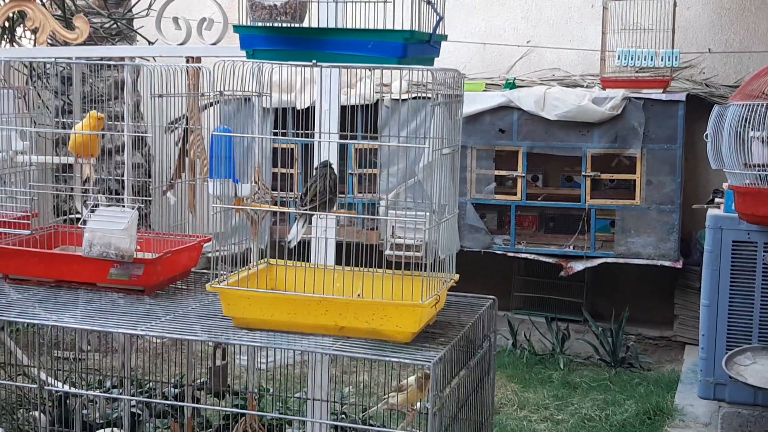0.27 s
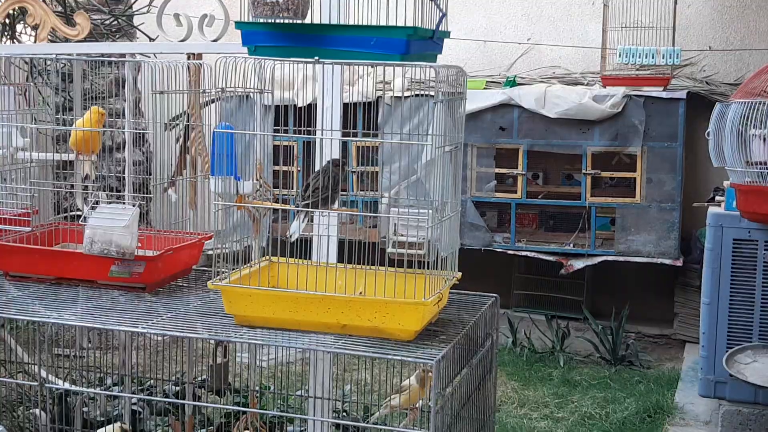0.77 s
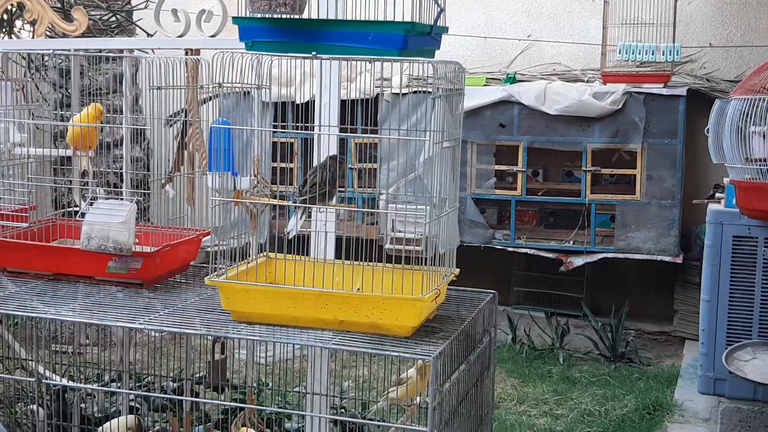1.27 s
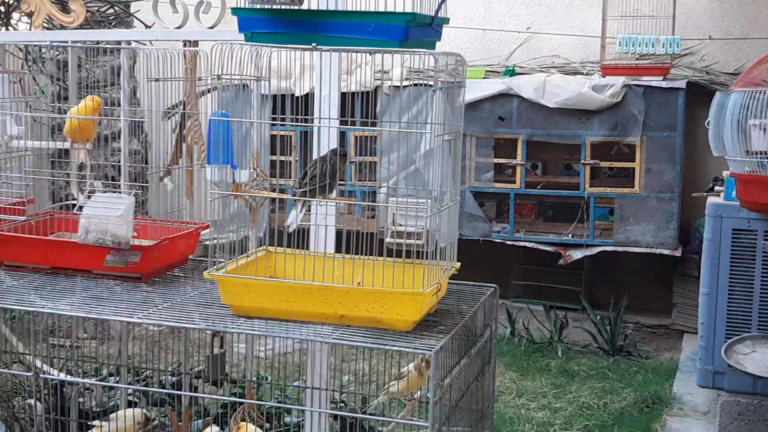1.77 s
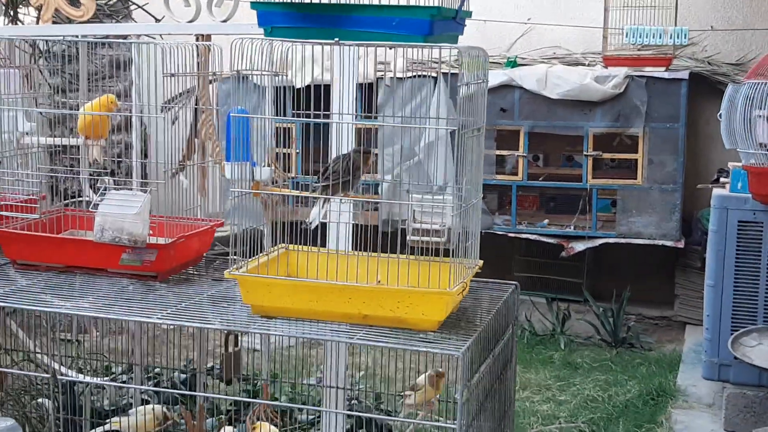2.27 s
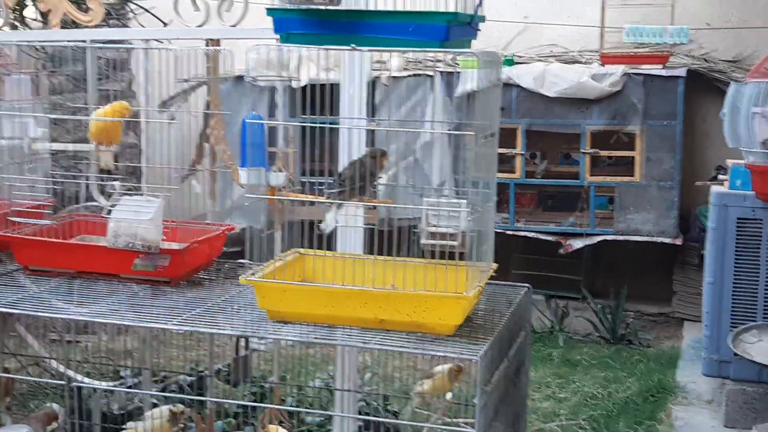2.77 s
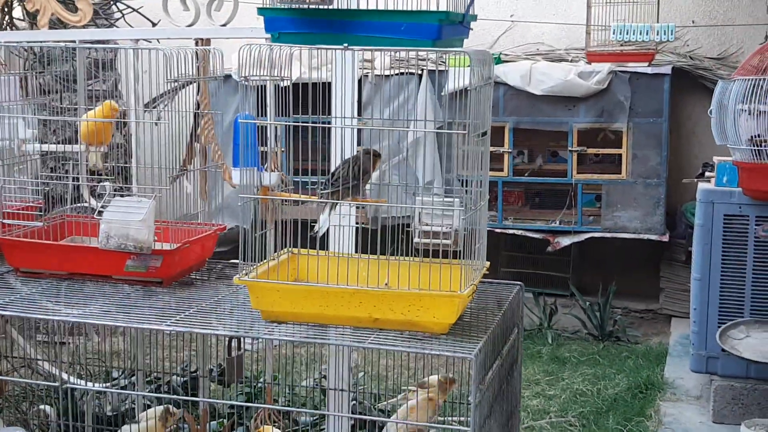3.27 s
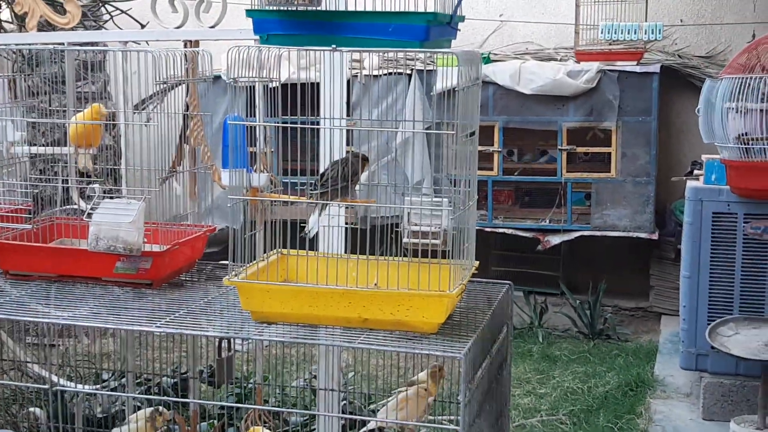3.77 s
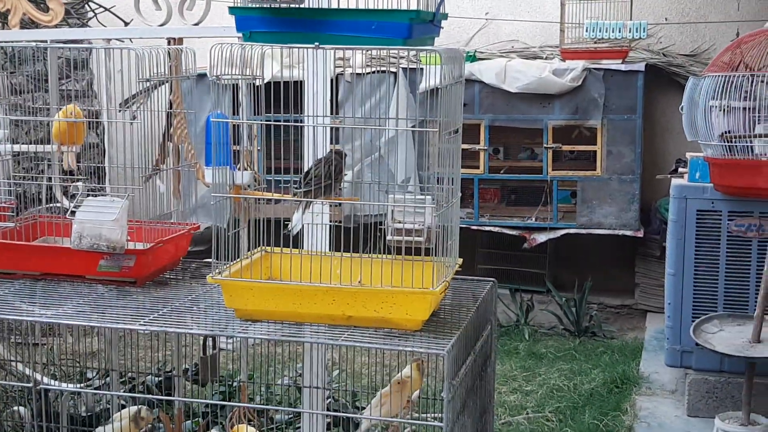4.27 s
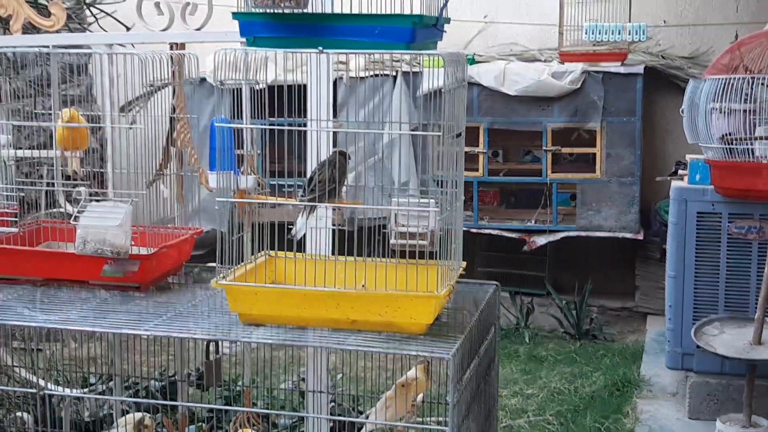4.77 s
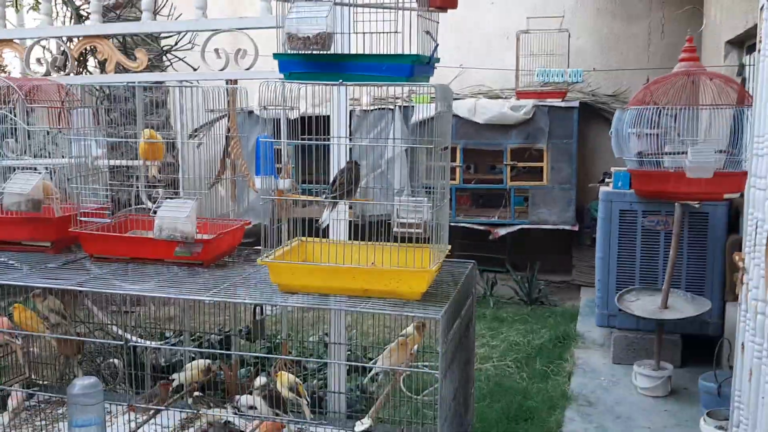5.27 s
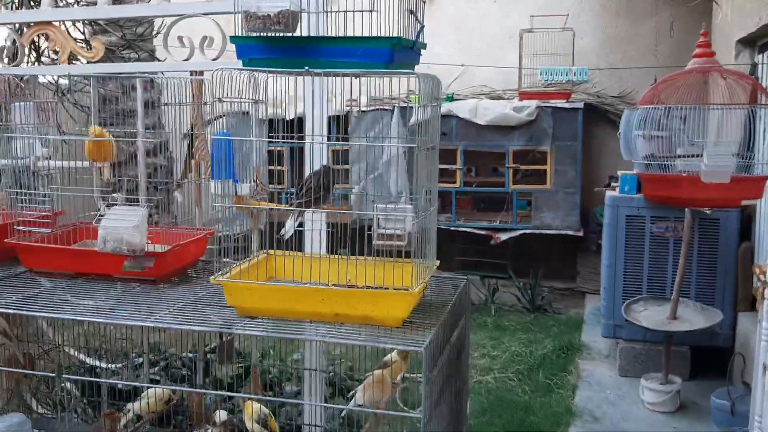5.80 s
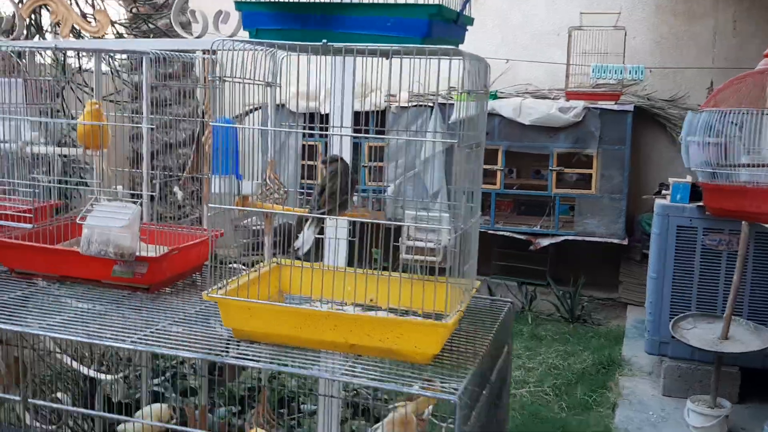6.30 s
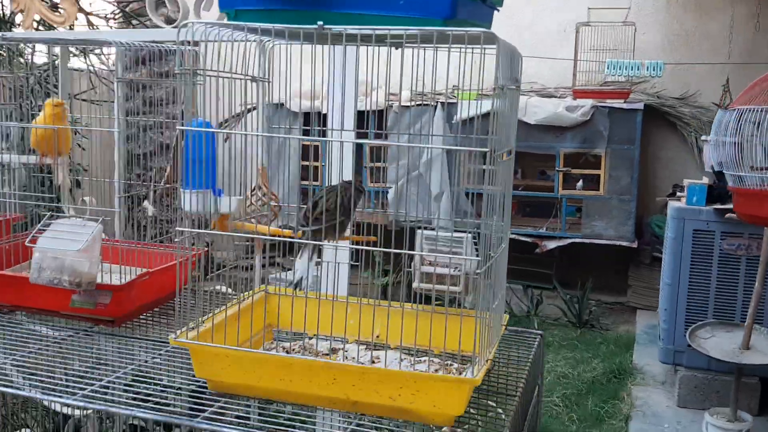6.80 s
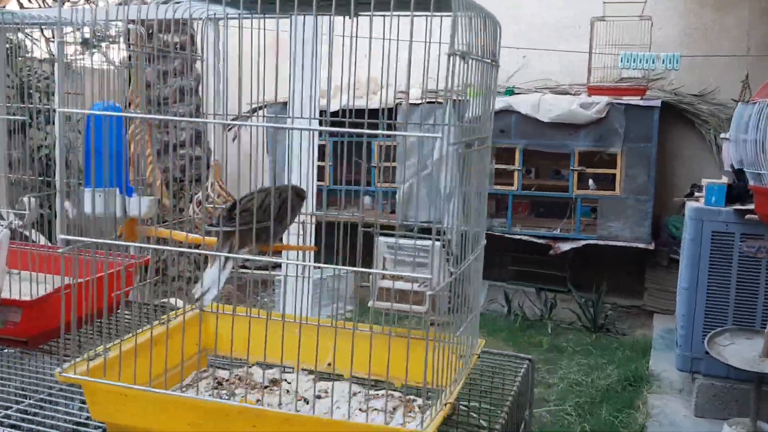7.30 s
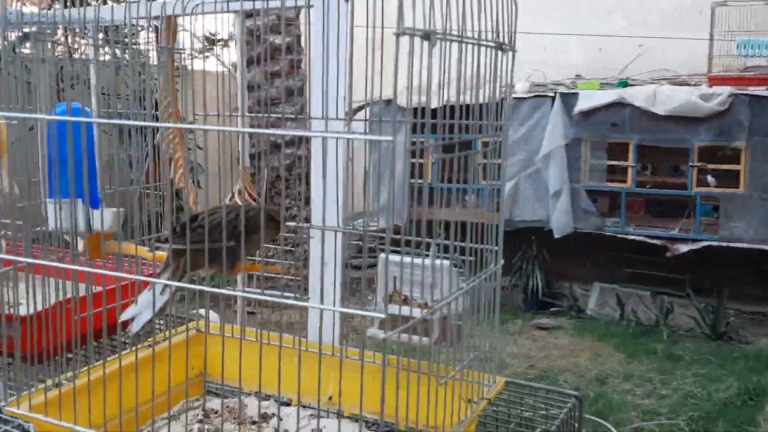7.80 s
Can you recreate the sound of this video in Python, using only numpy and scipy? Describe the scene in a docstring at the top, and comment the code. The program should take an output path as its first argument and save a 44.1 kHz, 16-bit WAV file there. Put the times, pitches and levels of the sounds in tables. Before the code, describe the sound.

Bright canary song with rising slurs, falling sweeps and fast trills fills an echoing yard, ending in loud sweet calls and handling rustle.

```python
"""Caged canaries in a courtyard

Canaries sing over one another: gliding sine whistles, arched chips, held notes and fast rolls of falling pips.
Random small slurs make the far birds; short noise bursts tick on the cages and shaped noise flutters and rustles.
Decaying noise echoes the walls; coloured noise and sines make the town rumble, low rush, hiss and hum.
The hand-held camera is carried closer with a rustle and a step, and the song's reflections weaken."""
import sys
import numpy as np
from scipy import signal
from scipy.fft import rfft, irfft, next_fast_len
from scipy.io import wavfile
from scipy.ndimage import uniform_filter1d, map_coordinates

SR = 44100
rng = np.random.default_rng(int(sys.argv[2]) if len(sys.argv) > 2 else 0)


def log_audio(samples):
    """Write samples as a 16-bit WAV file to the path given in sys.argv[1]."""
    # one column per channel
    frames = np.atleast_2d(samples).T
    # limit to full scale, then quantise
    limited = np.clip(frames, -1, 1)
    pcm = np.round(limited * 32767).astype(np.int16)
    wavfile.write(sys.argv[1], SR, pcm)


N = 355005

# Levels in the tables are relative: layer trims and the microphone's response follow.
# Pan is left against right in dB, positive to the left.
# A note's shape gives its offsets early, midway and late.

# Loudness shape of a steep pip or flick: [level/dB]
PIP_SHAPE = [-0.5, -1, -2.5]


def amp(db):
    """Decibels to gain."""
    return 10 ** (np.asarray(db) / 20)


def unit(x):
    """Scale to rms 1."""
    return x / np.sqrt(np.mean(x ** 2) + 1e-20)


def along(points, hz):
    """Read (f/Hz, value) points on a log frequency axis."""
    f, v = np.transpose(points)
    return np.interp(np.log(hz + 1), np.log(f + 1), v)


def curve(rows):
    """Turn (t/s, value) rows into one value per sample."""
    return np.interp(np.arange(N) / SR, *np.transpose(rows))


def wobble(rate, n):
    """A smooth random curve of n samples, with rate knots a second."""
    return map_coordinates(rng.standard_normal(int(n * rate / SR) + 4), [np.arange(n) * rate / SR])


def filtered(x, response):
    """Multiply the spectrum of x by a response of frequency."""
    n = x.shape[-1]
    m = next_fast_len(n + 8192)
    spectrum = rfft(x, m) * response(np.fft.rfftfreq(m, 1 / SR))
    return irfft(spectrum, m)[..., :n]


def noise(spectrum, n):
    """Coloured stereo noise of rms 1: left and right agree in the bass and part company towards the treble."""
    # Stereo likeness of diffuse sound: [f/Hz, left-right correlation]
    likeness = [(100, .985), (250, .88), (500, .6), (1000, .05), (3000, 0)]

    def colour(hz):
        turn = np.arccos(np.clip(along(likeness, hz), -1, 1)) / 2
        return amp(along(spectrum, hz)) * [np.cos(turn), np.sin(turn)]
    mid, side = filtered(rng.standard_normal((2, n)), colour)
    return unit(np.array([mid + side, mid - side]))


def panned(pan_db):
    """Left and right gains of mean power 1."""
    return unit(amp([[pan_db / 2], [-pan_db / 2]]))


def add(track, s, sound):
    """Mix a sound into the track at time s."""
    start = max(round(s * SR), 0)
    part = sound[..., :max(N - start, 0)]
    track[..., start:start + part.shape[-1]] += part


def whistle(length, pitch_hz, level_db):
    """One note of the syrinx: a nearly pure tone gliding through three pitches and three levels."""
    waver, flutter_db = 0.009, 3.5  # random pitch (share) and level on a full glide
    edge = 0.0045 + 0.073 * length  # fade in s: long notes swell and fade more gently
    t = np.arange(int((length + edge) * SR)) / SR
    u = (t - .002) / length
    hz = np.polyval(np.polyfit([0, .5, 1], pitch_hz, 2), np.clip(u, -.1, 1.1))
    # fast glides are less steady than held notes
    glide = min(1, abs(np.log2(pitch_hz[2] / pitch_hz[0])) * 3 + 0.41)
    hz = hz * (1 + waver * glide * wobble(199.5, len(t)))
    phase = 2 * np.pi * np.cumsum(hz) / SR
    gate = np.sin(np.pi / 2 * np.clip(np.minimum(t, t[-1] - t) / edge, 0, 1)) ** 2
    db = np.interp(u, [1 / 6, 1 / 2, 5 / 6], level_db)
    db = db + flutter_db * glide * wobble(118.0, len(t))
    tone = np.sin(phase) + amp(-42) * np.sin(2 * phase)
    tone += amp(-46) * np.sin(3 * phase) * (hz < SR / 6)  # keep the third harmonic below Nyquist
    return np.sqrt(2) * amp(db) * gate * tone


def near_paths(sound, pan_db, bounce_db):
    """Direct sound plus bounces off trays, table and ground; against a glide the late copies beat."""
    count, reach = 4, .016  # number of bounces, and the range of their delays in s
    lead, spread = .00006, .00004  # mean and scatter of the lag between microphone ports in s
    delays = np.r_[0, .0015 + reach * rng.random(count)]
    gains = np.r_[1, amp(bounce_db) * np.ones(count)]
    # every path reaches the two ports at slightly different times, bounces most of all
    lags = lead + spread * rng.standard_normal(count + 1) * np.r_[1, 3 * np.ones(count)]

    def paths(hz):
        response = 0
        for gain, delay, lag in zip(gains, delays, lags):
            arrivals = delay + np.array([[-lag], [lag]]) / 2
            response = response + gain * np.exp(-2j * np.pi * hz * arrivals)
        return response
    pair = filtered(np.pad(sound, (0, SR // 30)), paths)
    # the bounces change the colour but not the energy
    return panned(pan_db) * pair * np.linalg.norm(sound) / np.linalg.norm(pair, axis=1, keepdims=True)


def echo(sound):
    """The courtyard's answer: close reflections from cages and walls, then a longer tail of decaying noise."""
    # Reverberation of the walls by pitch: [f/Hz, t60/s]
    wall_decay = [(300, 0.22), (2500, 0.55), (4500, 0.64), (7000, 0.68), (14000, 0.1)]
    gap, early_db, early_s = .004, 3, 0.043  # silence before the echo in s; early boost and its decay time
    hz, t, z = signal.stft(rng.standard_normal((2, SR * 3 // 5)), SR, nperseg=256)
    decay = amp(-60 * t / along(wall_decay, hz)[:, None])
    tail = signal.istft(z * decay, SR, nperseg=256)[1]
    t = np.arange(tail.shape[1]) / SR
    tail *= (t > gap) * (1 + amp(early_db) * np.exp(-t / early_s))
    return signal.fftconvolve(sound[None], tail / np.linalg.norm(tail[0]), axes=1)


def chips():
    """Short arched chips: pitch and level crest midway."""
    # Chips: [t/s, length/s, top f/Hz, level/dB]
    chip_rows = [(.0, 0.018, 4984, -16), (.025, .025, 4480, -19), (0.131, 0.022, 2620, -30),
                 (.18, .054, 4920, -28.5), (0.196, 0.033, 3260, -31.5), (.259, 0.044, 3330, -27.5),
                 (2.379, 0.014, 3070, -25.5), (2.529, .024, 3025, -28), (2.62, 0.015, 3720, -20.5),
                 (2.69, .024, 3140, -25), (2.841, 0.033, 2960, -27), (2.912, .044, 3150, -25.5),
                 (2.979, .022, 3354, -23.5), (3.049, 0.023, 3344, -20), (3.595, 0.049, 3466, -25.5),
                 (3.665, 0.015, 4680, -20.5), (3.774, .045, 3280, -26), (4.054, 0.011, 3630, -24.5),
                 (4.273, 0.023, 2804, -28.5), (4.441, .028, 4760, -15), (4.546, .027, 4400, -17.5),
                 (4.559, .034, 3043, -23.5), (4.63, .044, 3290, -18.5), (4.735, 0.012, 3030, -15.5),
                 (4.812, 0.022, 3210, -15.5), (5.268, 0.037, 2970, -29.5), (5.351, 0.03, 2944, -27.5),
                 (5.445, 0.023, 2815, -28.5), (5.539, 0.033, 2736, -31.5), (5.709, 0.015, 3810, -25),
                 (5.77, .028, 4050, -24.5), (5.954, 0.041, 4570, -22), (5.963, .06, 3532, -23),
                 (6.081, 0.029, 3030, -27)]
    arch, shape_db = [0.95, 0.99, .86], [-3, 0.5, -7.5]  # pitch as a share of the top, and level
    for s, length, hz, db in chip_rows:
        yield s, length, np.multiply(hz, arch), np.add(db, shape_db), -12


def slurs(rows, hz_per_s, bow, crest_db, pan_db):
    """Glides at a set speed, so longer notes span more; bow and crest lift the middle's pitch and level."""
    for s, length, hz, db, fade_db in rows:
        glide_hz = hz_per_s * length * np.array([-.5, 0, .5])
        pitch_hz = hz * np.array([1 - bow, 1, 1 - bow]) + glide_hz
        yield s, length, pitch_hz, db + np.array([fade_db / 2, crest_db, -fade_db / 2]), pan_db


def falling_slurs():
    """Slurs that all fall at one speed; most swell instead of fading."""
    # Falling slurs: [t/s, length/s, middle f/Hz, level/dB, fade from start to end/dB]
    falling_rows = [(.011, .041, 5580, -29.5, -6), (.106, .056, 5635, -30.5, -11),
                    (.215, .055, 5670, -31, -6.5), (3.55, .03, 5830, -38.5, -0.5),
                    (3.622, .03, 5960, -34.5, 0.5), (3.678, 0.047, 5690, -25, -12.5),
                    (3.782, .03, 6000, -32.5, 4.5), (3.692, .029, 2880, -30.5, 4.5),
                    (3.82, .044, 5660, -23.5, -0.5), (3.873, .055, 3664, -28, 10),
                    (3.942, 0.045, 6060, -29.5, -14.5), (3.975, 0.057, 3480, -30.5, 3),
                    (4.095, .035, 5520, -25, -4.5), (5.351, .033, 5350, -25, -5.5),
                    (5.532, 0.022, 5330, -28, 2.5), (5.625, .045, 5100, -31, -8),
                    (6.636, 0.028, 4770, -27.5, 0)]
    yield from slurs(falling_rows, hz_per_s=-36000, bow=-0.0096, crest_db=0, pan_db=-12.5)


def flicks():
    """Single flicks that plunge much like the pips of a roll."""
    # Flicks: [t/s, middle f/Hz, level/dB]
    flick_rows = [(0.032, 4000, -20), (0.226, 4000, -25.5), (.324, 4090, -22), (2.58, 3820, -20.5),
                  (2.675, 3640, -30), (3.005, 3840, -24), (3.236, 3790, -31.5), (3.422, 3590, -39),
                  (3.775, 4250, -25), (4.132, 4260, -33), (5.772, 2640, -29.5), (5.88, 2274, -40),
                  (5.933, 2335, -35.5), (6.696, 2800, -32)]
    length, fall = .012, 0.19  # s; share of the middle pitch, each way
    for s, hz, db in flick_rows:
        yield s, length, hz * np.array([1 + fall, 1, 1 - fall]), np.add(db, PIP_SHAPE), -7


def rising_slurs():
    """The main syllable: slurs that all climb at one speed."""
    # Rising slurs: [t/s, length/s, middle f/Hz, level/dB, fade from start to end/dB]
    rising_rows = [(.075, 0.034, 4650, -30, 5.5), (.107, .032, 4630, -29, 2), (.384, 0.057, 4500, -30, 1),
                   (.439, 0.024, 3480, -29.5, 2), (.518, 0.028, 4510, -27, 7),
                   (.639, 0.067, 5750, -38.5, 11), (.755, 0.045, 5470, -32, 4.5),
                   (.835, .05, 4150, -26, 2.5), (.895, .06, 5150, -30.5, 6.5),
                   (1.001, 0.048, 4830, -25.5, 11.5), (1.113, 0.071, 5100, -27.5, 13),
                   (1.25, 0.069, 5210, -25, 11), (1.391, 0.062, 4340, -28.5, 5),
                   (1.506, 0.043, 4320, -27, -1.5), (1.607, 0.037, 4080, -27, 9),
                   (1.691, 0.057, 4120, -25, -7), (1.775, 0.072, 4600, -27.5, 5.5),
                   (2.784, 0.031, 5800, -33, 8), (4.666, 0.061, 5420, -28.5, 10.5),
                   (4.753, 0.084, 4965, -24, 15), (4.889, 0.082, 5280, -24.5, 12),
                   (5.047, .066, 4990, -24.5, 10.5), (5.169, 0.056, 4680, -25, 7.5),
                   (5.209, 0.025, 2990, -34.5, 4), (5.276, 0.054, 4780, -24.5, 11.5),
                   (5.295, 0.036, 4500, -25.5, -5.5), (5.383, 0.087, 5030, -24, 7),
                   (5.41, 0.048, 4675, -23.5, 1.5), (5.5, .04, 4600, -29, 4), (5.566, 0.034, 4360, -23, 12),
                   (5.687, 0.06, 5240, -25.5, 13), (6.3, 0.039, 5340, -36.5, -2),
                   (6.534, 0.04, 5250, -29.5, 7)]
    yield from slurs(rising_rows, hz_per_s=28500, bow=.025, crest_db=0.5, pan_db=-10)


def warble():
    """A low warble of evenly spaced, deep arches."""
    start, period, length = .597, .074, .053  # s
    arch_hz, shape_db = [2547, 3100, 2600], [-0.5, 1, -6]
    for k, db in enumerate([-23, -23, -27.5]):
        yield start + k * period, length, arch_hz, np.add(db, shape_db), -8


def held_whistles():
    """Held whistles from cages all round the yard, each drifting in pitch."""
    # Held whistles: [t/s, length/s, f/Hz, drift/Hz, level/dB, pan/dB]
    held_rows = [(0.614, 0.051, 5680, -100, -35, -14), (0.719, 0.19, 3690, -3, -26, 9),
                 (1.022, 0.19, 3657, -13, -27, 1), (1.094, 0.056, 4260, 144, -26, -14),
                 (1.37, 0.2, 3106, -14, -31.5, -12), (1.375, 0.16, 3880, -61, -25, -2),
                 (1.701, 0.13, 3850, -46, -25, -7), (1.704, 0.16, 3098, -29, -33, -16),
                 (1.854, 0.12, 5440, 92, -34, -8.5), (1.971, 0.025, 7010, -350, -33.5, -2),
                 (2.846, 0.078, 4324, 83, -29, -10), (3.619, 0.071, 2114, 69, -41.5, -1),
                 (3.621, 0.046, 6570, -300, -32, -5), (4.13, 0.11, 4960, -440, -23.5, -14),
                 (4.182, 0.21, 2292, 190, -47, 1), (4.488, 0.031, 5720, -150, -30, -12),
                 (4.89, .17, 2065, 70, -40, 9), (4.405, 0.02, 2392, -110, -33, 4),
                 (4.869, .17, 2526, -2, -43.5, -12), (5.393, 0.077, 2380, -100, -42.5, 4),
                 (5.629, 0.056, 2420, 0, -41.5, .5), (6.036, 0.046, 4490, 46, -34.5, -19),
                 (6.461, 0.063, 5250, 178, -34.5, -5.5), (6.593, 0.046, 4690, -1.5, -29, -19),
                 (6.634, 0.079, 3940, -180, -23, -26.5), (6.873, 0.047, 6590, -150, -31.5, -5.5)]
    # Loudness shape of a held whistle: [level/dB]
    held_shape = [0, 0.5, 0]
    for s, length, hz, drift_hz, db, pan_db in held_rows:
        pitch_hz = [hz - drift_hz / 2, hz, hz + drift_hz / 2]
        yield s, length, pitch_hz, np.add(db, held_shape), pan_db


def tsicks():
    """"Tsick" calls: a high hook that plunges."""
    # Tsick calls: [t/s, level/dB]
    tsick_rows = [(.658, -28), (.962, -29), (1.317, -21.5), (1.629, -21.5)]
    hook_s, hook_hz, hook_shape_db = .021, [6560, 6210, 6120], [-6, 2.5, 0]
    plunge_s, plunge_hz, plunge_shape_db = .013, [6190, 5400, 3960], [2, 3, -1.5]
    for s, db in tsick_rows:
        yield s, hook_s, hook_hz, np.add(db, hook_shape_db), -5
        yield s + hook_s, plunge_s, plunge_hz, np.add(db, plunge_shape_db), -5


def sweet_calls():
    """"Sweet" calls that mostly scoop up to a gently rising plateau."""
    # Sweet calls: [t/s, length/s, plateau f/Hz, scoop depth as a share of it, level/dB]
    sweet_rows = [(2.606, 0.044, 4120, .12, -31.5), (3.098, .049, 4307, .07, -24.5),
                  (3.325, .205, 4210, .03, -19.5), (5.138, 0.02, 3855, 0.35, -27),
                  (6.335, .081, 4090, .25, -23), (6.421, .09, 4003, 0.14, -26.5),
                  (6.571, .045, 3700, 0.3, -25), (6.69, .1, 4173, .025, -21),
                  (6.947, .074, 3995, -.05, -14), (7.121, .15, 4075, .055, -13.5),
                  (1.824, 0.16, 2700, .07, -41), (7.781, 0.039, 4300, .08, -42),
                  (7.794, 0.053, 3500, 0.21, -49.5)]
    lift, shape_db = 0.016, [-3, 1.5, -3]  # final rise as a share of the plateau, and level
    for s, length, hz, scoop, db in sweet_rows:
        yield s, length, hz * np.array([1 - scoop, 1, 1 + lift]), np.add(db, shape_db), -8.5


def sweeps():
    """Long sweeps down the whole range: a soft high half hands over to a loud low half."""
    # Sweeps: [hand-over t/s, high half length/s, low half length/s, start f/Hz, level/dB]
    sweep_rows = [(2.063, .028, .072, 5700, -15), (2.358, .112, 0.11, 6850, -19.5),
                  (2.711, 0.14, .088, 6700, -17.5), (3.056, 0.15, 0.088, 6650, -17)]
    hand_over_hz, high_shape_db = 4930, [-14, -11, -5]
    low_hz, low_shape_db = [4860, 3910, 3147], [-1.5, 1, -2.5]
    for s, high_length, low_length, start_hz, db in sweep_rows:
        high_hz = [start_hz, (start_hz + hand_over_hz) / 2, hand_over_hz]
        yield s - high_length, high_length, high_hz, np.add(db, high_shape_db), -9.5
        yield s, low_length, low_hz, np.add(db, low_shape_db), -9.5


def syllables():
    """Every near note but the rolls, as (t/s, length/s, three pitches/Hz, three levels/dB, pan/dB)."""
    for kind in (chips, falling_slurs, flicks, rising_slurs, warble, held_whistles, tsicks, sweet_calls, sweeps):
        yield from kind()


def canaries():
    """Each note has its own bounces and echo; fainter birds sit further off and echo more."""
    # Camera moving up to the cage: [t/s, reflections against direct sound/dB]
    approach = [(6.3, 0), (6.95, -6)]
    direct_db, near_wet_db, far_wet_db, bounce_db = -0.96, -5, -3, -12.0
    held_db, echo_pan = -3, 0.7  # reflection trim of long notes; share of the pan kept by the echo
    out = np.zeros((2, N))
    for s, length, pitch_hz, level_db, pan_db in syllables():
        note = whistle(length, pitch_hz, level_db)
        reflect_db = np.interp(s, *np.transpose(approach))
        # long held pitches stand out more clearly from their reflections
        if length > .08 and np.ptp(pitch_hz) < 450:
            reflect_db += held_db
        wet_db = reflect_db + np.interp(max(level_db), [-34, -17], [far_wet_db, near_wet_db])
        answer = echo(note)
        answer *= np.linalg.norm(note) / np.linalg.norm(answer, axis=1, keepdims=True)
        add(out, s, amp(direct_db) * near_paths(note, pan_db, bounce_db + reflect_db))
        add(out, s, amp(wet_db) * panned(echo_pan * pan_db) * answer)
    return out


def ports(song):
    """The two microphone ports share the song's power unevenly from pitch to pitch."""
    # The highest notes lean to the left port: [f/Hz, pan/dB]
    port_balance = [(5700, 1), (6600, 5.5), (7400, 1.5), (9000, 1.5)]

    def gains(hz):
        pair = amp(np.outer([.5, -.5], along(port_balance, hz)))
        return pair / np.sqrt(np.mean(pair ** 2, axis=0))
    return filtered(song, gains)


def far_birds():
    """The rest of the aviary twitters at random: small slurs up and down, with much echo."""
    # Swelling and sinking of the far birds: [t/s, level/dB]
    chatter_level = [(0, -27), (.6, -32), (1.1, -38), (2.2, -48), (2.7, -23), (3.1, -42), (3.35, -40),
                     (3.8, -26), (4.3, -40), (5.1, -38.5), (5.4, -30.5), (5.7, -32), (6.1, -55.5),
                     (6.55, -26.5), (6.85, -43.5), (8.05, -48.5)]
    gain_db, pan_db, wet_db, count = -8, -3, 1, 300
    chatter = np.zeros((2, N))
    for when, length, pitch, slope, side in rng.random((count, 5)):
        glide = 1.15 ** ((2 * slope - 1) * np.array([-1, 0, 1]))
        slur = whistle(.015 + .04 * length, 2850 * 1.9 ** pitch * glide, [-3, 0, -3])
        add(chatter, when * N / SR, panned(pan_db + 20 * (side - .5)) * slur)
    answer = panned(pan_db) * echo(chatter.mean(axis=0))[:, :N]
    return amp(curve(chatter_level) + gain_db) * unit(chatter + amp(wet_db) * answer)


def airy_edge(song):
    """A faint, grainy fizz far above the song that swells with its higher notes."""
    # Colour of the fizz: [f/Hz, level per Hz/dB]
    fizz_colour = [(6000, -45), (9000, -9), (11000, 1), (13000, 4.5), (16000, 0)]
    gain_db, grain_db, above_hz = -34.0, 3.5, 5100
    high = filtered(song, lambda hz: 1 - 1 / (1 + (hz / above_hz) ** 10))
    loudness = np.sqrt(abs(uniform_filter1d(high ** 2, size=1500, axis=1)))
    fizz = unit(noise(fizz_colour, N) * amp(grain_db * wobble(87, N)))
    return amp(gain_db) * loudness * fizz


def background():
    """Coloured noise for town rumble, low rush and faint hiss; phase-wandering sines for an unsteady hum."""
    # Hum partials: [f/Hz, level/dB]
    hum_partials = [(98.5, -48.5), (198, -63.5), (264, -59.5), (1526, -70.5)]
    # Brief low bumps from handling the camera: [t/s, half length/s, rise/dB]
    handling_bumps = [(0, 0.076, 12.5), (1.567, 0.18, 8), (6.755, 0.21, 8)]
    # Colour of the town rumble: [f/Hz, level per Hz/dB]
    rumble_colour = [(20, -29), (35, -20.5), (52, 4.5), (70, 0), (85, 1.5), (120, 2), (170, -6),
                     (260, -11.5), (500, -52), (1000, -95)]
    # Colour of the low rush in the yard: [f/Hz, level per Hz/dB]
    rush_colour = [(90, -35.5), (180, 0.5), (260, 0), (400, -4), (550, -8), (800, -6.5), (1300, -14),
                   (2500, -11), (6000, -40)]
    # The low rush, swelling as the camera moves: [t/s, level/dB]
    rush_level = [(0, -40), (.15, -49.5), (1.3, -48), (2, -45.5), (2.8, -50), (4.4, -48), (6.3, -49.5),
                  (6.8, -42), (7.5, -51.5), (8.05, -46.5)]
    # Colour of the hiss: [f/Hz, level per Hz/dB]
    hiss_colour = [(300, -28), (1000, -28), (2200, 19.5), (4000, -17.5), (6500, 14.5), (8000, -5),
                   (10000, -17.5), (12500, -5), (16000, -20)]
    town_db, hiss_db, drift = -47.5, -56, 0.38  # drift is in radians
    t = np.arange(N) / SR
    hum = np.zeros(N)
    for hz, db in hum_partials:
        hum += np.sqrt(2) * amp(db) * np.sin(2 * np.pi * hz * t + drift * wobble(4.5, N))
    swell_db = sum(db * np.maximum(0, 1 - abs(t - s) / half) for s, half, db in handling_bumps)
    town = amp(town_db + swell_db) * noise(rumble_colour, N)
    rush = amp(curve(rush_level)) * noise(rush_colour, N)
    hiss = amp(hiss_db) * noise(hiss_colour, N)
    return hum + town + rush + hiss


def pips():
    """The pips of each roll as (t/s, length/s, f/Hz, level/dB): as a roll slows down, its pips lengthen."""
    # Rolls: [first pip t/s, last pip t/s, mean pips per s, slowing 0-1, middle f/Hz,
    #         first pip length/s, last pip length/s, first level/dB, middle level/dB, last level/dB]
    roll_rows = [(.094, 0.55, 28.4, 0.01, 3320, .007, .008, -26, -24, -26.5),
                 (1.325, 3.605, 21.05, .317, 2995, .007, .02, -39.5, -30.5, -31.5),
                 (5.178, 5.595, 29, 0.03, 4710, 0.0054, 0.0062, -24, -17, -22)]
    scatter_db, scatter = 1.5, .025  # random level, and pitch as a share
    for first, last, rate, slowing, hz, first_length, last_length, *level_db in roll_rows:
        for u in np.linspace(0, 1, round((last - first) * rate) + 1):
            s = first + (last - first) * u * (1 - slowing * (1 - u))
            length = first_length + u * (last_length - first_length)
            db = np.interp(u, [0, .5, 1], level_db) + scatter_db * rng.standard_normal()
            yield s, length, hz * (1 + scatter * rng.standard_normal()), db


def roll():
    """Rolling trills: short pips, each falling steeply in pitch."""
    wet_db, pan_db, fall = -9, -6, 0.162  # fall is a share of the middle pitch, each way
    out = np.zeros((2, N))
    for s, length, hz, db in pips():
        pip = whistle(length, hz * np.array([1 + fall, 1, 1 - fall]), np.add(db, PIP_SHAPE))
        start = s - .002  # a whistle's glide begins 2 ms in
        add(out, start, near_paths(pip, pan_db, bounce_db=-7))
        add(out, start, amp(wet_db) * panned(pan_db / 2) * echo(pip))
    return out


def cage_ticks():
    """Claws and beaks on wire and perch: dry little noise bursts that die away at once."""
    # The clearest contacts: [t/s, peak level/dB, pan/dB]
    tick_rows = [(1.507, -28.5, -10.5), (1.6625, -21.5, -7.5), (1.7674, -27.5, -7.5), (2.249, -27.5, -14),
                 (2.4451, -31, -10), (2.938, -22, -13), (3.694, -31.5, -14.5), (4.023, -33.5, -11.5),
                 (4.2567, -28.5, -7), (5.819, -29.5, -5.5), (7.1159, -27, -9.5), (7.524, -32, -10.5),
                 (7.6646, -34.5, -20), (7.8901, -29.5, 1)]
    # Colour of a tick: [f/Hz, level/dB]
    tick_colour = [(300, -10), (1500, -3.5), (3500, 7.5), (6000, 7.5), (11000, -13), (16000, -9.5)]
    gain_db, t60, wet_db = -5, 0.065, -7  # t60 in s
    faint_until = 6  # s: the random faint ticks fall before this time; the clearer ticks go on
    faint = []
    for when, size in rng.random((14, 2)):
        faint.append((when * faint_until, -35.5 + 9.5 * (size - .5), -11.5))
    out = np.zeros((2, N))
    t = np.arange(SR // 10) / SR
    for s, db, pan_db in list(tick_rows) + faint:
        tick = amp(db + gain_db - 60 * t / t60) * noise(tick_colour, len(t))
        add(out, s, panned(pan_db) * tick)
        add(out, s, amp(wet_db) * echo(tick[0]))
    return out


def rustles():
    """Wing flutters, the rub of handling and the scuff of a shoe: grainy brushes of band-limited noise."""
    # Brushes: [t/s, length/s, level/dB, centre f/Hz, width/octaves]
    rustle_rows = [(1.447, 0.28, -48, 274, 0.68), (5.96, .16, -33, 3200, 0.59), (6.518, .55, -40.5, 402, 1),
                   (7.194, 0.035, -31, 2210, 0.22), (7.194, .2, -46.5, 1950, .75),
                   (7.194, 0.099, -33, 4300, 0.56), (7.933, 0.25, -45, 1910, .5),
                   (7.972, 0.1, -31, 4800, 0.66)]
    grain_db, wet_db, pan_db = 3, -5, -2
    out = np.zeros((2, N))
    for s, length, db, centre_hz, width in rustle_rows:
        n = int(length * SR)
        band = lambda hz: 1 / (1 + (np.log2((hz + 1) / centre_hz) / width) ** 6)
        grains = noise([(1000, 0)], n) * amp(grain_db * wobble(220, n))
        brush = unit(filtered(grains, band)) * amp(db) * np.sqrt(np.hanning(n))
        add(out, s, panned(pan_db) * brush)
        add(out, s, amp(wet_db) * echo(brush[0]))
    return out


def footfall():
    """The soft thud of a step: one decaying burst of low noise."""
    # The step: [t/s, level/dB, t60/s]
    step_row = (7.191, -32, 0.1)
    # Colour of the thud: [f/Hz, level/dB]
    step_colour = [(60, -24), (200, -3.5), (380, 2), (800, -16.5), (2000, -3.5), (6000, -59)]
    s, db, t60 = step_row
    out = np.zeros((2, N))
    t = np.arange(SR // 5) / SR
    add(out, s, amp(db - 60 * t / t60) * noise(step_colour, len(t)))
    return out


def scene():
    """Birds, cages and the courtyard around them."""
    song = ports(canaries()) + roll() + far_birds()
    return song + airy_edge(song) + background() + cage_ticks() + rustles() + footfall()


def record(dry):
    """The microphone has a deep notch in the treble, and the camera a sharp upper band limit."""
    # Microphone response: [f/Hz, gain/dB]
    microphone = [(6400, 2), (7200, 2), (8000, -10.5), (8600, -20), (9400, -3.5), (10500, 8), (12000, 8.5)]
    top_hz = 15850
    return filtered(dry, lambda hz: amp(along(microphone, hz)) * (hz < top_hz))


dry = scene()
out = record(dry)
log_audio(out)
```